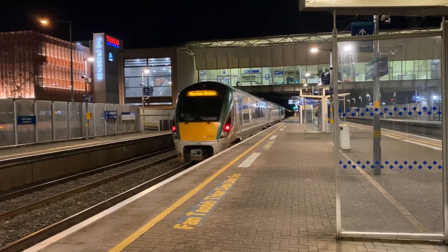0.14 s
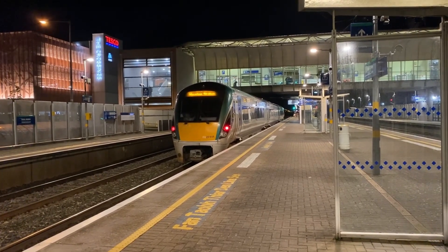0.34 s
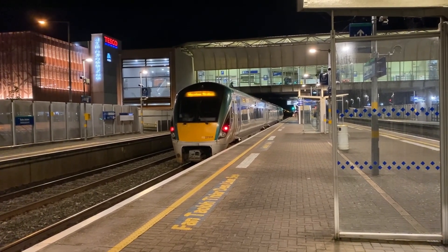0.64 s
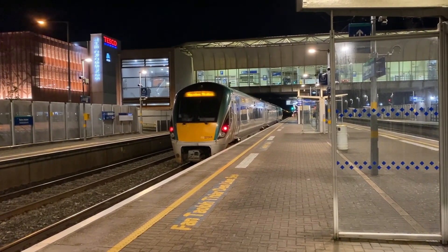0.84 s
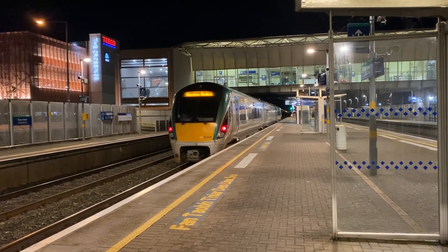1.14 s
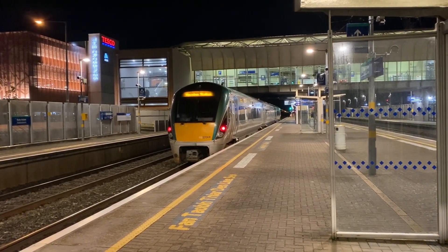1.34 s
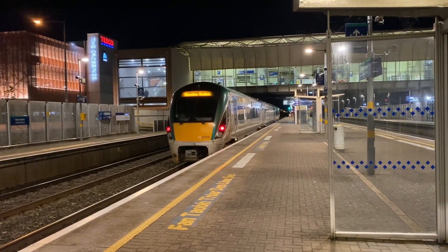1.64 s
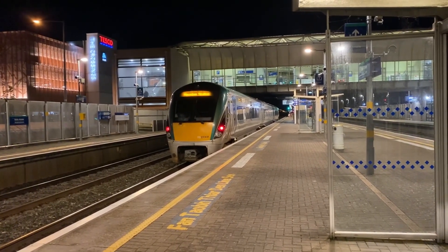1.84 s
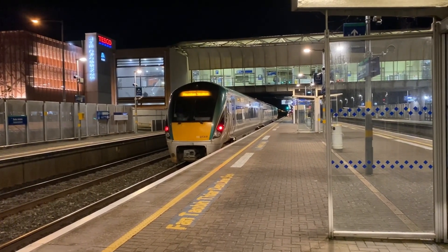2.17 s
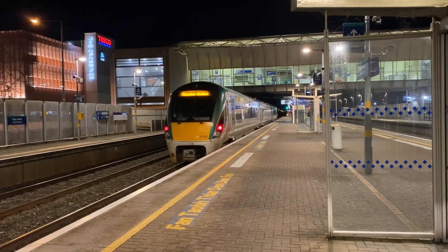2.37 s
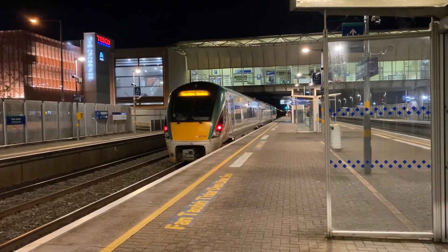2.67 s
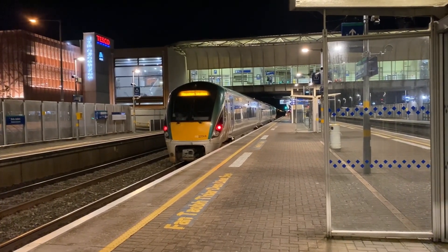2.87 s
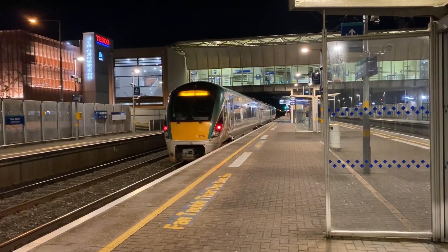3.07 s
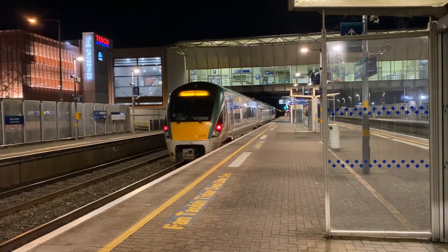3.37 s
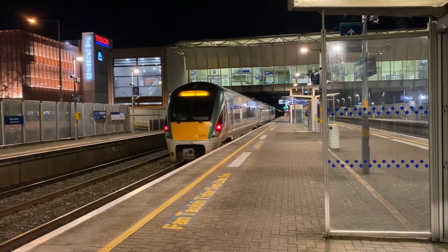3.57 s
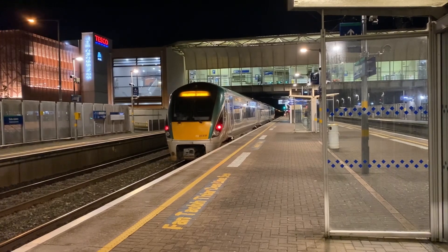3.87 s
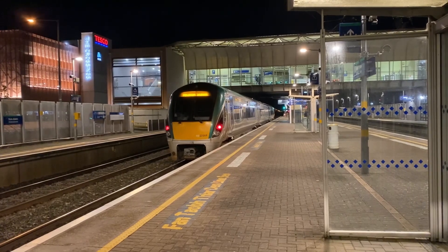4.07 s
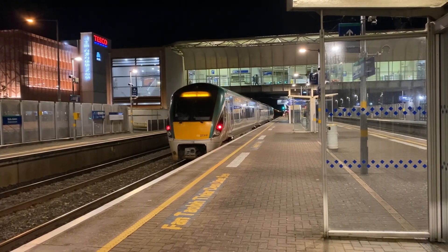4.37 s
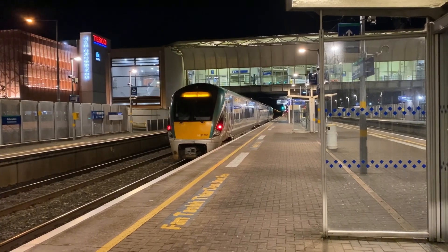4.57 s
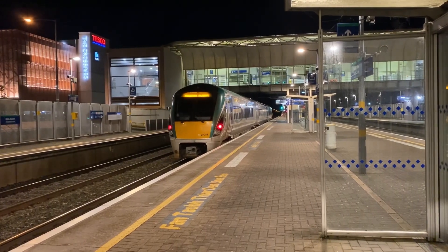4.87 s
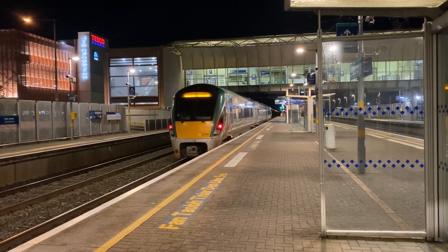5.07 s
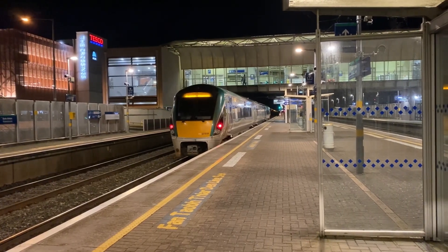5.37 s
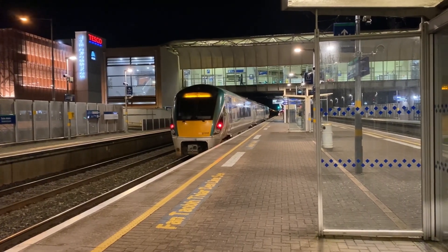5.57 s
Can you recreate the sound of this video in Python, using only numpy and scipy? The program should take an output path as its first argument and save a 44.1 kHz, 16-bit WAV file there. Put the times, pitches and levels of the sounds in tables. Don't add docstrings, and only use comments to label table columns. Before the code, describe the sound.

Dull station rumble, a brief brake squeak and air burst, then several underfloor diesel engines climb in pitch with gear whine and steady roar.

```python
import sys
import numpy as np
from scipy import signal
from scipy.fft import rfft, irfft
from scipy.io import wavfile
from scipy.ndimage import uniform_filter1d

SR = 44100
rng = np.random.default_rng(int(sys.argv[2]) if len(sys.argv) > 2 else 0)


def generate_wav(signal):
    frames = np.transpose(np.atleast_2d(signal))
    scaled = np.clip(frames, -1, 1) * 32767
    pcm = np.round(scaled).astype(np.int16)
    wavfile.write(sys.argv[1], SR, pcm)


def magnitude_from_level(level_db):
    exponent = np.asarray(level_db, float) / 20
    return 10 ** exponent


N = 251811
T = np.arange(N) / SR
HZ = np.arange(N // 2 + 1) * SR / N

# t/s, load level/dB, air level/dB
LOAD = [(0, -8, -13), (.35, -7, -12.5), (.52, -5, -9), (.65, -5.5, 1), (.9, -2.5, 4), (1.2, -0.5, -1),
        (1.6, 0.5, -3.5), (2.1, -1, -3), (2.7, -0.5, -4), (2.92, 1.5, -3.5), (3.2, 4, 1), (3.5, 2, 3),
        (3.9, 1.5, 2), (4.4, 2, 1.5), (5, 2, 3.5), (5.71, 2, 3)]
# f/Hz, density/(dB per Hz)
ROAR = [(45, -57), (110, -65), (250, -56), (350, -64), (500, -72), (700, -68), (1300, -70), (1650, -75),
        (2100, -71), (2750, -83), (4000, -83), (5500, -85.5), (11500, -93), (15000, -99.0)]
# f/Hz, share of load/1, share of air/1
FOLLOWS = [(150, 1.05, -0.077), (335, 1.28, -0.13), (914, 0.35, 0.099), (1910, 0.68, 0.19),
           (3560, 0.69, .15), (5500, 0.27, 0.45), (9300, .05, 1)]
# f/Hz, width/Hz, level/dB
DUCTS = [(328.3, 17, -47), (650, 31, -50), (716, 33, -50.5), (970, 160, -48.5), (1418, 160, -49),
         (1930, 110, -55), (2300, 120, -63), (3310, 560, -57.5), (3845, 430, -59.5)]
# f/Hz, left lead/half turns
PORT_PHASE = [(0, 0), (4500, .1), (6700, 2), (7600, 1.95), (8400, 1), (9500, 1), (10350, 0), (11700, 0),
              (12550, -1), (13750, -1), (14550, -2), (22050, -2)]
# f/Hz, likeness/0-1
PORT_LIKENESS = [(60, .99), (250, .95), (400, .85), (640, .62), (1000, .5), (2400, .52), (4400, .7),
                 (5800, .6), (7000, .84), (9000, .91), (15000, .9)]
# f/Hz, left minus right/dB
PORT_BALANCE = [(60, -2.5), (110, -10.5), (200, 1), (380, 0.5), (700, 1), (1290, -1.5), (2380, -0.5),
                (4400, 5), (8120, 2), (15000, 0)]
# t/s, generator level/dB, panel level/dB
STANDING = [(0, -41.5, -50), (.6, -52, -53), (.95, -47, -39), (1.1, -34, -45), (1.25, -33, -33.5),
            (1.5, -55, -45), (2.7, -46, -60), (3.9, -43, -60), (4.5, -44, -48), (5.71, -47, -58)]
STANDING_HZ = (50.3, 121.8)
# t/s, f/Hz, level/dB
FAN = [
    (0, 482, -52.5),
    (.7, 482, -59),
    (1., 480, -83),
]
# t/s, f/Hz, level/dB
PUMP = [
    (4.6, 1274, -75),
    (5.2, 1280, -45.5),
    (5.71, 1295, -52),
]
# t/s, f/Hz, level/dB
BRAKE = [(.41, 6720, -80), (.45, 6680, -58), (.5, 6640, -59), (.54, 6530, -57), (.6, 6380, -66),
         (.8, 6380, -67), (1., 6380, -80)]
# t/s, f/Hz, level/dB
TURBO = [(3.27, 7200, -78), (3.35, 7450, -56), (3.47, 7800, -57), (3.55, 8000, -66), (4., 8900, -66),
         (4.35, 9330, -58), (4.8, 9650, -61), (5.2, 9900, -64), (5.71, 10100, -67)]
# t/s, f/Hz, level/dB
FIRST_MESH = [(2.9, 1580, -60), (3.02, 1645, -47), (3.15, 1718, -52), (3.35, 1817, -52), (3.55, 1868, -49),
              (3.8, 1890, -62), (3.95, 1892, -41.5), (4.15, 1903, -49), (4.55, 1934, -43.5),
              (5.1, 1963, -42), (5.45, 1961, -44), (5.55, 1962, -58), (5.71, 1964, -60)]
SECOND_MESH = [(3.3, 1705, -62), (3.38, 1718, -44), (3.55, 1740, -68), (3.8, 1768, -45.5),
               (3.95, 1804, -50), (4.1, 1818, -45), (4.3, 1844, -47), (4.5, 1858, -46), (4.75, 1868, -48),
               (5, 1881, -50), (5.4, 1884, -49), (5.6, 1882, -42), (5.71, 1885, -45)]
THIRD_MESH = [
    (2.75, 1490, -75),
    (2.95, 1490, -56),
    (3.1, 1480, -42),
    (3.2, 1496, -75),
]
HIGH_MESH = [
    (3.2, 1940, -75),
    (3.301, 1990, -46),
    (3.38, 2030, -47),
    (3.48, 2040, -60),
    (3.55, 2043, -75),
]
# t/s, firing f/Hz, level/dB
FIFTH = [(0, 70, -75), (1.2, 69, -62), (1.5, 76.6, -43), (1.8, 80.52, -54), (2.7, 80.35, -32),
         (3.3, 79.8, -44), (3.6, 80.1, -54), (4.2, 80.8, -37), (4.6, 82.01, -57), (5.4, 83.72, -56),
         (5.71, 84.2, -58)]
# t/s, f/Hz, level/dB
SILENCER = [(1.2, 405, -70), (1.4, 422, -48), (1.72, 425, -50), (1.85, 438, -42), (2.3, 441, -46.5),
            (2.58, 429, -48), (2.95, 428, -42.5), (3.05, 432, -50), (3.2, 440, -75)]
# f/Hz, level/dB
PLATFORM = [(146, 0), (156, -13), (168, -13.5), (178, 0.5), (252, 0.5), (266, -23), (289, -7), (312, -25)]
# t/s, firing f/Hz, firing note level/dB, overtone level/dB
FIRST = [(.3, 40.2, -46, -50), (.48, 45.3, -39, -40.5), (.62, 48.1, -27.5, -28.5),
         (.75, 49.23, -18.5, -24.5), (.9, 48.34, -27.5, -29.5), (1.05, 54.93, -39, -50),
         (1.2, 57.53, -50, -42), (1.5, 71.67, -65, -73), (2.85, 72.4, -62, -47), (3.15, 81, -42, -28),
         (3.4, 85.8, -22, -19), (3.6, 88.9, -34.5, -45), (3.75, 87.13, -21, -38), (4.05, 90.47, -23.5, -31),
         (4.5, 91.62, -28.5, -24.5), (4.8, 93, -25.5, -22.5), (5.25, 93.4, -24.5, -26.5),
         (5.71, 94.63, -35.5, -21.5)]
SECOND = [(0.0, 52.76, -67, -62.0), (0.75, 53.5, -60, -62), (0.9, 55.35, -39, -43.5), (1.2, 73.8, -50, -37),
          (1.5, 78.88, -38.0, -36), (1.8, 77.7, -55, -50), (2.55, 76.82, -53, -50), (2.85, 77.54, -53, -40),
          (3.3, 77.09, -50, -27), (3.45, 80.22, -32, -34), (3.75, 84.15, -32, -26.5),
          (4.05, 86.14, -24.5, -32), (4.35, 87.7, -36, -27), (4.65, 89.43, -22.5, -26.5),
          (4.95, 89.5, -38, -32.5), (5.1, 90.16, -42, -32), (5.4, 89.95, -35, -40),
          (5.71, 90.57, -33.5, -29.0)]
THIRD = [(.75, 50.2, -60, -56), (1.05, 55.04, -26, -49), (1.2, 67.6, -25, -46), (1.38, 70.4, -30.5, -34.5),
         (1.5, 72.27, -44, -29), (1.65, 71.25, -36, -32), (1.95, 72.14, -19.5, -32.5),
         (2.25, 72.4, -19.5, -32), (2.55, 72, -22.5, -31.5), (2.75, 71.1, -28, -34),
         (2.9, 71.4, -45, -36.5), (3.04, 72, -26, -36), (3.3, 72.8, -31, -37), (3.45, 72.2, -33, -37),
         (3.75, 74.3, -43, -39.5), (4.5, 78.36, -55, -29.5), (4.85, 79.7, -52, -45),
         (5.5, 80.63, -52, -35.5)]
FOURTH = [(0.0, 70, -64, -62.0), (2.85, 69.51, -67, -49), (3.0, 72.77, -56, -39),
          (3.15, 78.7, -60.0, -38.0), (3.3, 82, -60.0, -36), (3.6, 83.5, -60.0, -15),
          (3.75, 86.55, -58, -31), (3.9, 87.92, -60.0, -23), (4.05, 89.2, -60.0, -47),
          (4.2, 90.4, -54, -26), (4.35, 91.8, -49, -39), (4.5, 92.74, -27, -56), (4.65, 93.3, -43, -46),
          (4.8, 94.25, -29, -61), (4.95, 95.4, -36.0, -47), (5.25, 96.2, -35, -47), (5.4, 96.49, -37, -59),
          (5.71, 96.75, -40, -52)]
CRANK_LEAD = (-.04, .37, .48, -.25)
# level/dB}, left minus right of firing note/dB, of overtones/dB
ENGINES = [(FIRST, {2: 0, 3: -21}, -1.24, -.6), (SECOND, {2: 0, 3: 0}, -.6, 0.92),
           (THIRD, {2: 0, 3: 0, 4: 0}, -1.36, -0.4), (FOURTH, {2: 0}, -0.49, 0.61)]


def curves(table):
    t_s, *columns = np.transpose(table)
    return [np.interp(T, t_s, column) for column in columns]


def on_log(table, hz):
    f_hz, value = np.transpose(table)
    return np.interp(np.log(np.maximum(hz, 1)), np.log(f_hz), value)


def walk(rate_hz):
    hold = int(SR / rate_hz)
    steps = np.repeat(rng.standard_normal(N // hold + 1), hold)
    slewed = uniform_filter1d(uniform_filter1d(steps, hold), hold)
    return 1.51 * slewed[:N]


def band(shape):
    real = rng.standard_normal((2, len(HZ)))
    imag = rng.standard_normal((2, len(HZ)))
    x = irfft(shape * (real + 1j * imag), N)
    return x / np.sqrt(np.mean(x ** 2))


def tone(hz, db, turns=0, rough_db=2.5, rate_hz=25):
    phase_turns = np.cumsum(hz) / SR + turns
    return np.sqrt(2) * magnitude_from_level(db + rough_db * walk(rate_hz)) * np.cos(2 * np.pi * phase_turns)


def panned(x, pan_db):
    return x * magnitude_from_level(np.array([[pan_db], [-pan_db]]) / 2)


def gas_roar(load_db, air_db):
    at_hz, load_share, air_share = np.transpose(FOLLOWS)
    spectrum = magnitude_from_level(on_log(ROAR, HZ))
    out = np.zeros((2, N))
    for hz in 40 * 2 ** (np.arange(18) / 2):
        of_load = np.interp(np.log(hz), np.log(at_hz), load_share)
        of_air = np.interp(np.log(hz), np.log(at_hz), air_share)
        db = of_load * load_db + of_air * air_db + 0.5 * walk(3) + 0.7 * walk(9)
        octaves = np.log2(np.maximum(HZ, 1) / hz)
        shape = np.cos(np.pi * np.clip(octaves, -0.5, 0.5)) * spectrum
        rms = np.sqrt(np.sum(shape ** 2) * SR / N)
        out += band(shape) * rms * magnitude_from_level(db)
    return out


def ducts(load_db, air_db):
    out = np.zeros((2, N))
    for hz, width_hz, db in DUCTS:
        resonance = 1 / (1 + ((HZ - hz) / (width_hz / 2)) ** 2)
        out += band(resonance) * magnitude_from_level(db + 0.96 * load_db + 0.073 * air_db + 1.6 * walk(4.94))
    return out


def roar():
    load_db, air_db = curves(LOAD)
    firing_hz = curves(THIRD)[0]
    pulse = 1 + 0.05 * np.cos(2 * np.pi * np.cumsum(firing_hz) / SR)
    return (gas_roar(load_db, air_db) + ducts(load_db, air_db)) * pulse


def standing_hums():
    out = np.zeros(N)
    for hz, db in zip(STANDING_HZ, curves(STANDING)):
        out += tone(np.full(N, hz), db, rough_db=3.0)
    return out


def whistles():
    out = np.zeros(N)
    for table in (FAN, PUMP, BRAKE, TURBO, THIRD_MESH, HIGH_MESH):
        hz, db = curves(table)
        out += tone(hz * (1 + 0.002 * walk(60)), db, rate_hz=40)
    return out


def gear_mesh(table):
    fade_s = 0.098
    hz, db = curves(table)
    fade = np.clip((T - table[0][0]) / fade_s, 0, 1)
    return fade * tone(hz * (1 + 0.00069 * walk(30)), db, rough_db=2.7)


def gears():
    runout_hz, runout_top_s = 6.9, 4.7
    throb = 1 + 0.5 * np.cos(2 * np.pi * runout_hz * (T - runout_top_s))
    return throb * gear_mesh(FIRST_MESH) + gear_mesh(SECOND_MESH)


def ports(direct, diffuse):
    turn = np.exp(0.5j * np.pi * np.interp(HZ, *np.transpose(PORT_PHASE)))
    tilt = magnitude_from_level(on_log(PORT_BALANCE, HZ) / 2)
    like = np.clip(on_log(PORT_LIKENESS, HZ), 0, 1)
    mid = rfft(direct) + np.sqrt((1 + like) / 2) * rfft(diffuse[0])
    side = np.sqrt((1 - like) / 2) * rfft(diffuse[1])
    left = (mid + side) * turn * tilt
    right = (mid - side) / turn / tilt
    return irfft(np.array([left, right]), N)


def far_engine():
    hz, db = curves(FIFTH)
    return tone(3 * hz, db, rate_hz=8.6)


def silencer():
    hz, db = curves(SILENCER)
    return tone(hz, db, rate_hz=12)


def exhausts():
    out = np.zeros((2, N))
    for lead, (engine, orders, note_pan_db, over_pan_db) in zip(CRANK_LEAD, ENGINES):
        hz, note_db, over_db = curves(engine)
        out += panned(tone(hz, note_db, lead, rough_db=0.7), note_pan_db)
        for order, order_db in orders.items():
            db = over_db + order_db + on_log(PLATFORM, order * hz)
            out += panned(tone(order * hz, db, order * lead, rough_db=1.22), over_pan_db)
    return out


def scene():
    air = ports(whistles() + gears(), roar())
    return air + standing_hums() + far_engine() + silencer() + exhausts()


def top_cut(x):
    return signal.sosfilt(signal.butter(12, 16710, fs=SR, output="sos"), x)


def record(dry):
    high_pass = signal.butter(4, 40, "high", fs=SR, output="sos")
    low_pass = signal.ellip(8, 0.2, 70, 15500, fs=SR, output="sos")
    mix = signal.sosfilt(low_pass, signal.sosfilt(high_pass, dry))
    return top_cut(mix)


dry = scene()
out = record(dry)
generate_wav(out)
```